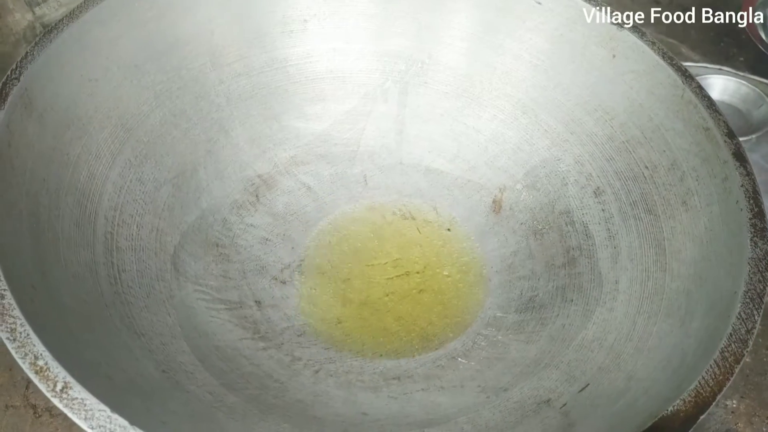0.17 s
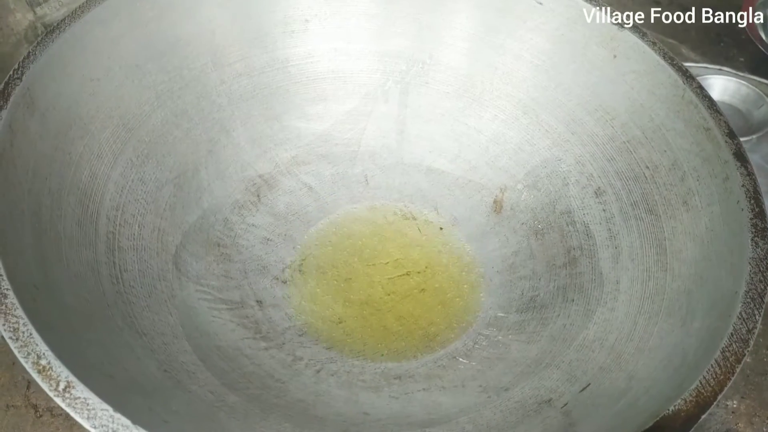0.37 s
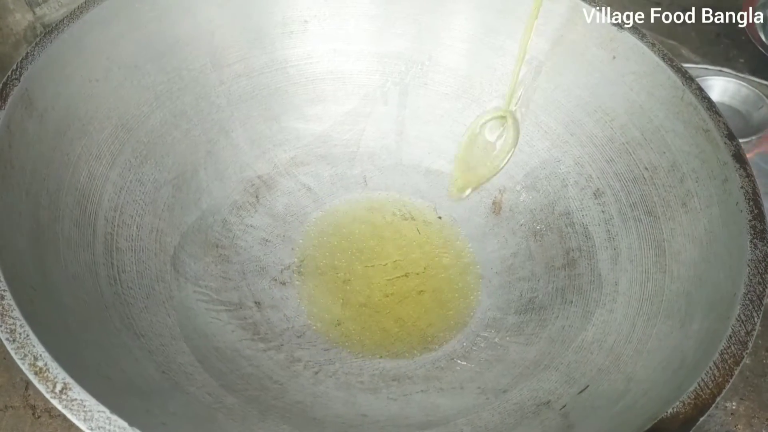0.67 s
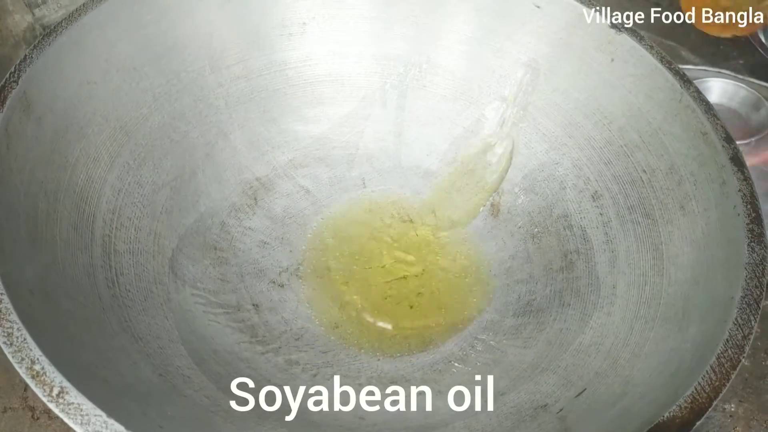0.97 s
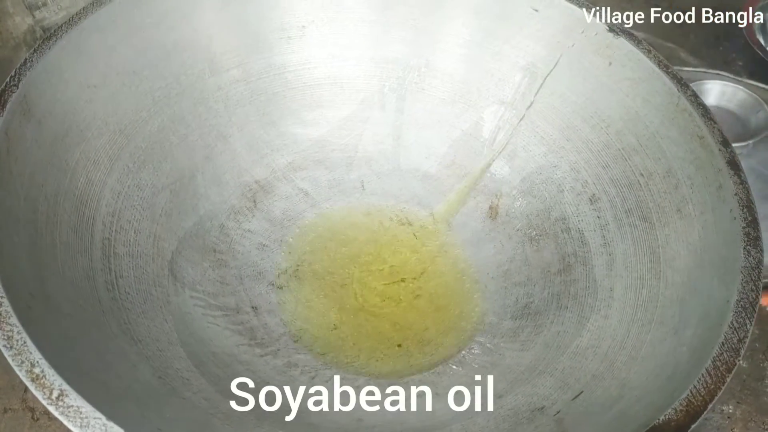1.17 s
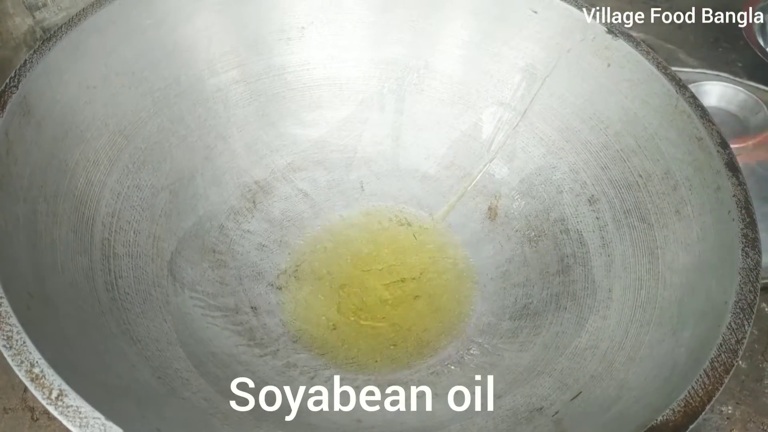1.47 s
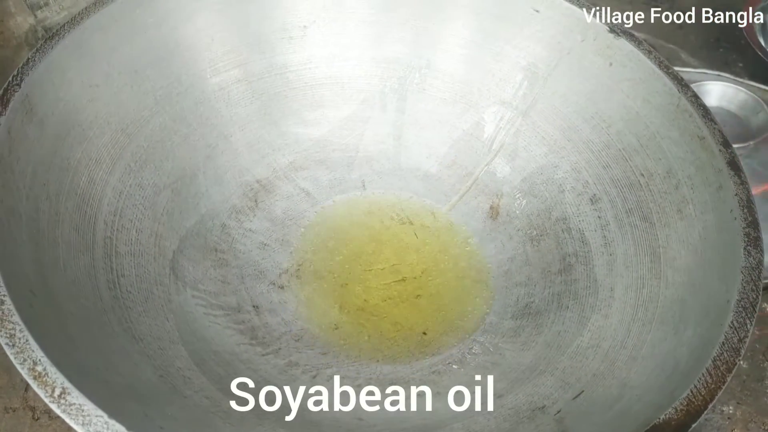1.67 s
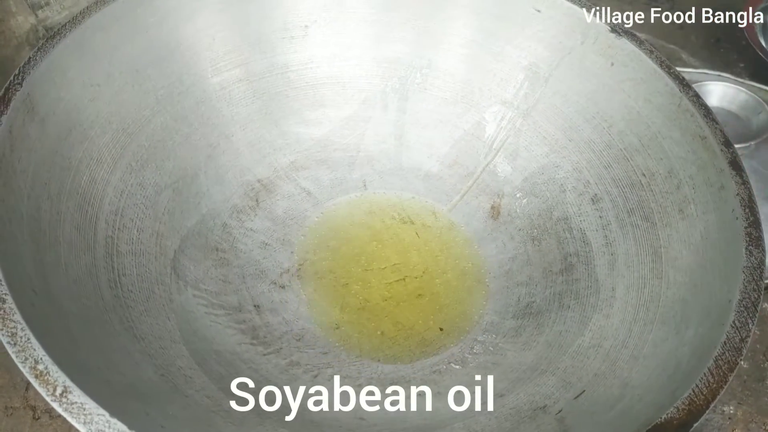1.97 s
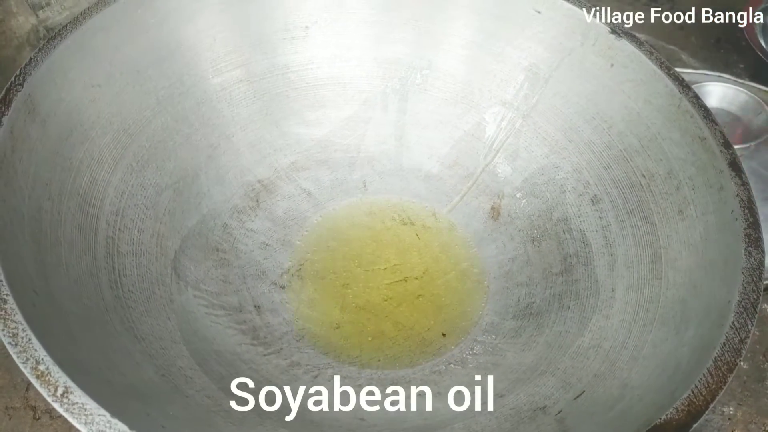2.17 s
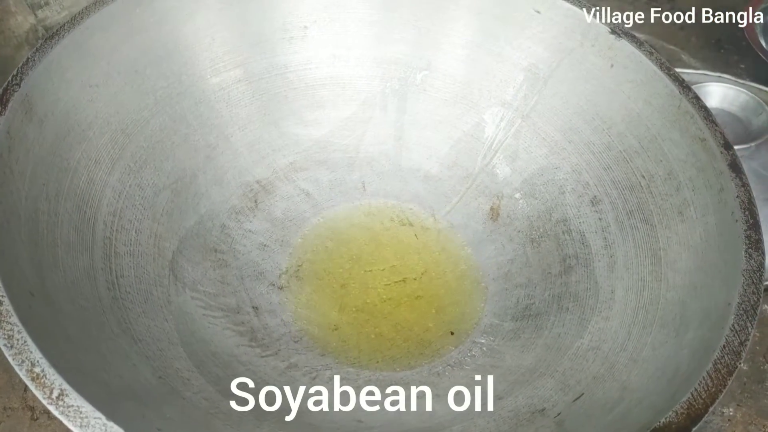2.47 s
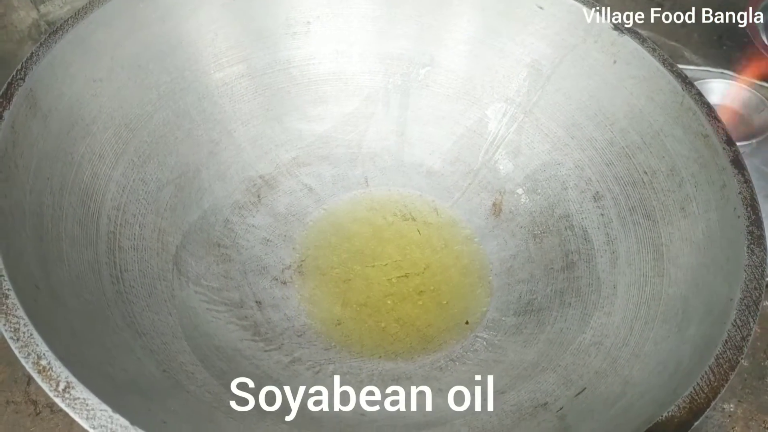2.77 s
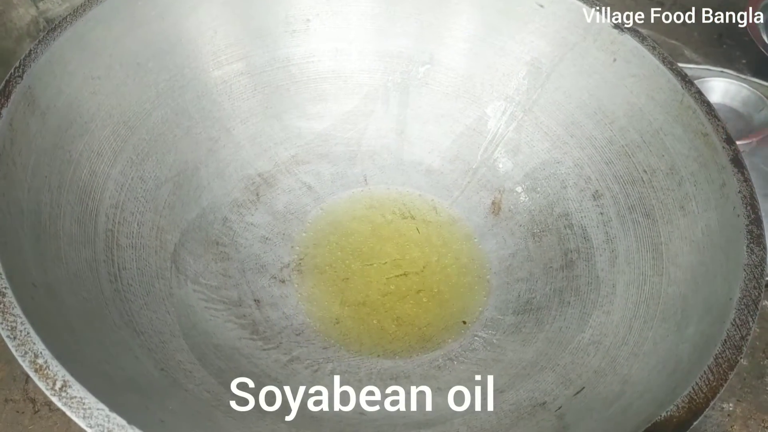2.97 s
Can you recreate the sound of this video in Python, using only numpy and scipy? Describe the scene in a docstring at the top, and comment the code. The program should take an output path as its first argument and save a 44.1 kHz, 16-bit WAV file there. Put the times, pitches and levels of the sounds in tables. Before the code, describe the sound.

Hot oil crackles and pops in a wide metal pan over a low flame

```python
"""Hot oil crackles in a wide metal pan over a burner, heard close up in stereo for 3.1 s.
From the start a low flame roar, a wavering hum, tiny spatters and a treble hiss run underneath, all shaped noise.
From 0.12 s steam bubbles burst: noise with a kick rings each at its own pitch and sprays hiss; a few ring cleanly.
Gurgles (clustered resonances) swell throughout and dry snaps (coloured clicks) join at 0.5 s; the pan rings along.
The treble hiss peaks near 0.9 s, sinks, and rises again at 2 s; the last pop falls at 2.8 s."""
import sys
import numpy as np
from scipy import signal
from scipy.fft import rfft, irfft
from scipy.io import wavfile
from scipy.ndimage import uniform_filter1d

SR = 44100
rng = np.random.default_rng(int(sys.argv[2]) if len(sys.argv) > 2 else 0)


def store_pcm(level_fs):
    """Save levels as 16-bit WAV."""
    pcm = np.round(np.clip(level_fs, -1, 1) * 32767).astype(np.int16)
    wavfile.write(sys.argv[1], SR, np.atleast_2d(pcm).T)


N = 136710


def amp(db):
    """Amplitude factor of a level in dB."""
    return 10 ** (np.asarray(db) / 20)


def evened(x):
    """Scales to rms 1."""
    return x / np.sqrt(np.mean(x ** 2) + 1e-20)


def peaked(x):
    """Scales each channel so that its strongest 8 ms have rms 1."""
    return x / np.sqrt(uniform_filter1d(x ** 2, size=350).max(axis=-1, keepdims=True) + 1e-20)


def read(points, hz):
    """Interpolates (Hz, value) points over log frequency."""
    f, value = np.transpose(points)
    return np.interp(np.log(hz + 1), np.log(f + 1), value)


def add(mix, start_s, sound):
    """Adds a stereo sound, cut at the end of the mix."""
    part = mix[:, max(round(start_s * SR), 0):][:, :sound.shape[1]]
    part += sound[:, :part.shape[1]]


def resonate(x, hz, width_hz):
    """Two-pole resonance of gain 1."""
    return signal.lfilter(*signal.iirpeak(hz, hz / width_hz, SR), x)


def band(x, low_hz, high_hz):
    """Butterworth band-pass."""
    return signal.sosfilt(signal.butter(2, [low_hz, high_hz], "bandpass", fs=SR, output="sos"), x)


def clumps(count):
    """Ragged gain, 2 dB rms: a burst is a clump of many small releases."""
    smooth_s = 0.0024
    ragged = uniform_filter1d(rng.standard_normal(count), round(smooth_s * SR))
    return amp(2 * evened(ragged))


def cluster(x, hz, spread, q):
    """Five bubbles of nearby pitch ring together, in alternating polarity."""
    steps = np.arange(-2, 3) + rng.uniform(-0.48, 0.46, 5)
    pitches_hz = hz * np.exp(spread * 0.75 * steps)
    return sum(resonate(x, f, f / q) * (-1) ** k for k, f in enumerate(pitches_hz))


def pop(time_s, ring_db, hz, spray_hz, spray_db, t60_s):
    """The skin snaps and a sputtering release of steam rings the bubble and sprays coloured hiss."""
    rise_s, kick, bubble_q, bubble_db = 0.003, 2.55, 5.6, -15.5
    spray_top_db, droplet_q, spray_wide = -9, 87, 0.33
    t = np.arange(8000) / SR
    noise = rng.standard_normal((2, len(t)))
    swell = np.minimum(t / rise_s, 1) ** 1.4 * clumps(len(t))
    release = swell * amp(-60 * t / t60_s)

    drive = release * noise
    drive[:, round(rise_s * SR)] += kick
    ring = peaked(resonate(resonate(drive, hz, hz / bubble_q), hz, 1.54 * hz))

    spray = release * noise[::-1]  # channels swapped
    wide, top = band(spray, 3200, 8150), band(spray, 11400, 22000)
    coloured = cluster(wide, spray_hz, 0.195, droplet_q) + spray_wide * wide
    coloured_top = cluster(top, 13080, 0.26, droplet_q) + spray_wide * top
    hiss = amp(spray_db) * peaked(coloured)
    hiss = hiss + amp(spray_db + spray_top_db) * peaked(coloured_top)
    return time_s - 0.44 * rise_s, amp(ring_db + bubble_db) * ring + hiss


def ping(start_s, level_db, hz, t60_s):
    """One bubble breaks free and rings cleanly: a decaying sine, alike in both channels."""
    t = np.arange(8000) / SR
    ring = amp(level_db - 60 * t / t60_s) * np.sin(2 * np.pi * hz * t)
    return start_s, band(ring, hz / 2, 2 * hz) * np.ones((2, 1))


def snap(click_s, peak_db, hz):
    """One coloured click inside a ragged puff of spray that builds just before it."""
    low_hz, q, tail_db, t60_s, dryness = 2300, 1.8, -20, 0.03, 0.93
    t = np.arange(-200, 3000) / SR
    fade_db = -60 * np.maximum(t, -3.5 * t) / t60_s
    puff = amp(tail_db - dryness * peak_db + fade_db)  # strong snaps are drier
    drive = puff * rng.standard_normal((2, len(t))) * clumps(len(t))
    drive[:, t == 0] = 1
    wide = band(drive, low_hz, 22000)
    sound = resonate(wide, hz, hz / q) + 0.54 * wide
    return click_s + t[0], amp(peak_db) * sound / abs(sound).max()


def gurgle(start_s, length_s, level_db, hz, spread):
    """A bloom of bubbles that swells fast and sinks slowly."""
    q, skew = 18.8, 0.43
    noise, clump = rng.standard_normal((2, 9000)), clumps(9000)
    u = np.arange(max(-start_s, 0), length_s, 1 / SR)[:9000] / length_s
    sound = evened(resonate(cluster(noise * clump, hz, spread, q), hz, hz / 2))
    bloom = np.sin(np.pi * u ** skew) ** 2
    return start_s, amp(level_db) * bloom * sound[:, :len(u)]


def sizzle():
    """Tiny spatters: decaying noise grains at random moments, in 12 pitch bands."""
    per_s, spread_db, level_db, low_hz, high_hz, bands = 420, 7, -44, 2710, 14100, 12
    out, t = np.zeros((2, N)), np.arange(900) / SR
    for hz in np.geomspace(low_hz, high_hz, bands):
        size = amp(spread_db * np.minimum(rng.exponential(1, N), 4))
        hits = size * (rng.random(N) < per_s / bands / SR)
        grain = resonate(rng.standard_normal((2, len(t))) * amp(-60 * t / 0.03), hz, hz / 3)
        out += signal.oaconvolve(hits[None], evened(grain), axes=1)[:, :N]
    return amp(level_db) * evened(out)


def pan(x):
    """Metal modes and a short diffuse tail from bowl and kitchen answer every sound of the oil."""
    # Each row: frequency in Hz, relative level in dB, t60 in s.
    pan_modes = [(2167, 10, 0.16), (2890, 14.5, 0.038)]
    modes_db, bowl_db, bowl_t60_s = -19.5, -8.5, 0.22
    t = np.arange(14000) / SR
    modes = sum(amp(db - 60 * t / t60_s) * np.sin(2 * np.pi * hz * t) / np.sqrt(t60_s * SR)
                for hz, db, t60_s in pan_modes)
    tail = rng.standard_normal((2, len(t))) * amp(-60 * t / bowl_t60_s) * (t > .004)
    answer = amp(modes_db) * modes + amp(bowl_db) * tail / np.linalg.norm(tail[0])
    return x + signal.fftconvolve(x, answer, axes=1)[:, :N]


def fizz():
    """Fine treble hiss of the hot oil: noise in patches of time and frequency that sputter."""
    # Level of the hiss before the sputter. Each row: time in s, level in dB.
    hiss_levels = [(0, -53), (.75, -59), (.9, -33), (1.8, -45), (2.0, -38), (2.45, -42.5), (3.1, -42)]
    a, b, c, d, patches = rng.standard_normal((N // 64 + 5, 129, 5)).T
    patches = evened(uniform_filter1d(uniform_filter1d(patches, 6, 0), 30, 1))
    flicker = evened(uniform_filter1d(a[0], 10))  # common to all bins
    z = np.array([a + 1j * b, c + 1j * d]) * amp(4 * patches + 3.5 * flicker)
    noise = signal.istft(z, nperseg=256, noverlap=192)[1][:, :N]
    hiss = evened(band(noise, 4500, 16400))
    level_db = np.interp(np.arange(N) / SR, *np.transpose(hiss_levels))
    return amp(level_db) * clumps(N) * hiss


def flame():
    """Low lumpy roar (spectrally shaped noise) and a wavering hum (narrowly resonated noise)."""
    # Spectrum of the roar. Each row: frequency in Hz, relative level in dB per Hz.
    roar_spectrum = [(25, -29.5), (140, -21), (205, 2), (430, -11), (700, -14.5), (1380, -15.5),
                     (2430, -18), (4740, -18.5), (10000, -50)]
    roar_db, patch_db = -37.5, 2.23
    hum_hz, width_hz, hum_db = 196.8, 6.8, -50.5
    frames, hz = N // 512 + 5, np.fft.rfftfreq(2048, 1 / SR)
    a, b, c, d, patches = rng.standard_normal((frames, 1025, 5)).T
    patches = evened(uniform_filter1d(uniform_filter1d(patches, 12, 0), 5, 1))
    shape = amp(read(roar_spectrum, hz)[:, None] + patch_db * patches)
    z = np.array([a + 1j * b, c + 1j * d]) * shape
    roar = signal.istft(z, nperseg=2048, noverlap=1536)[1][:, :N]
    hum = resonate(rng.standard_normal((2, N)), hum_hz, width_hz)
    hum = resonate(hum, hum_hz, width_hz)
    return amp(roar_db) * evened(roar) + amp(hum_db) * evened(hum)


def scene():
    """Sums all sources in two channels, then sets likeness, phase and level between left and right."""
    # Steam bursts. Each row: time in s, relative ring level in dB, bubble pitch in Hz,
    # spray centre in Hz, spray level in dB, decay t60 of the release in s.
    pops = [(0.1227, -3, 2230, 7350, -22, 0.033), (0.1512, -7.5, 2650, 5360, -21.5, 0.051),
            (.2267, -14.5, 2730, 4370, -25.5, 0.081), (0.2545, -16, 4570, 4260, -27, 0.035),
            (0.2917, -1.5, 3130, 4880, -22, 0.033), (0.32, -9, 4580, 4790, -49, 0.045),
            (.432, -10, 2950, 7820, -21, 0.11), (.618, -11.5, 3000, 4430, -33, 0.072),
            (0.6396, -7.5, 2890, 8260, -27, 0.058), (0.721, -22, 2920, 7160, -30, 0.03),
            (0.8288, -13.5, 2770, 4550, -17.5, 0.13), (0.873, -8, 2600, 4760, -24.5, 0.041),
            (0.8954, -32, 2830, 5170, -23.5, 0.071), (1.013, -18, 2130, 8300, -31, 0.25),
            (1.038, -24, 4300, 6670, -21.5, 0.034), (1.082, -16, 4520, 7130, -25.5, 0.1),
            (1.149, -23, 4700, 7410, -23.5, 0.044), (1.3388, -8, 3760, 4730, -22, 0.12),
            (1.356, -11.5, 2890, 5320, -20, 0.026), (1.4358, -1.5, 3390, 4450, -35, 0.052),
            (1.4658, -25, 3160, 5140, -30.5, 0.3), (1.6203, -5.5, 3430, 4990, -22, .08),
            (1.7546, -22, 4960, 8900, -46.5, .06), (1.986, -10.5, 4140, 4660, -35.5, 0.13),
            (2.0828, -9.5, 3770, 4990, -20.5, 0.093), (2.3388, -12, 3880, 4530, -47, 0.059),
            (2.549, -41, 4460, 5360, -20.5, 0.031), (2.5682, -21, 4570, 4800, -25, 0.054),
            (2.8094, -8.5, 5400, 6050, -23, 0.032)]
    # Gurgles under the oil. Each row: start in s, length in s, level before the swell in dB,
    # pitch in Hz, relative pitch spread as a share.
    gurgles = [(-.03, 0.097, -27.5, 1510, 0.13), (0.384, 0.063, -33.5, 2120, 0.12),
               (0.487, 0.063, -32, 2050, 0.073), (.648, 0.034, -22.5, 2400, 0.038),
               (0.839, 0.053, -15, 2874, 0.02), (.86, 0.28, -34, 2310, 0.1), (1.005, 0.13, -36, 2090, 0.11),
               (1.474, 0.11, -32.5, 2016, 0.21), (1.57, 0.11, -34, 2140, 0.059),
               (2.001, 0.11, -33, 2160, .12), (2.098, 0.067, -30, 1920, 0.055),
               (2.167, 0.11, -30.5, 1555, 0.14), (2.239, 0.076, -33, 2030, 0.058),
               (2.37, 0.13, -28, 1826, 0.2), (2.481, 0.16, -34, 2057, 0.095),
               (2.868, 0.11, -37.5, 2120, 0.087), (2.943, 0.079, -30.5, 2150, 0.096)]
    # Dry snaps of single droplets. Each row: click time in s, peak in dB, colour in Hz.
    snaps = [(0.5007, -17, 13100), (.7132, -15, 8300), (.7247, -11.5, 6600), (0.7807, -11, 4400),
             (0.822, -14.5, 7850), (0.828, -24, 6500), (0.952, -15, 7800), (1.017, -10.5, 7800),
             (1.0735, -6, 7500), (1.135, -23, 8500), (1.207, -21, 10500), (1.2511, -12.5, 8900),
             (1.285, -9.5, 8500), (1.3998, -9.5, 9500), (1.622, -9, 4000), (1.76, -10.5, 11900),
             (1.833, -28, 5960), (1.845, -27, 13000), (1.883, -16.5, 7900), (1.9308, -10.5, 12000),
             (1.943, -6, 13100), (1.965, -7, 13100), (2.018, -16.5, 8700), (2.058, -17, 8000),
             (2.0868, -13, 9200), (2.194, -5, 11000), (2.5234, -15.5, 9800), (2.6722, -1.5, 5800),
             (2.7571, -10, 6450), (2.9916, -24.5, 10000), (3.0426, -27, 10200)]
    # Single clean bubbles. Each row: start in s, level before the band-pass in dB, pitch in Hz, t60 in s.
    pings = [(0.2942, -12.5, 2920, 0.029), (0.641, -5, 2942, 0.029), (1.097, -39.5, 1053, 0.24),
             (2.3381, -3, 3800, .006)]
    # Left-right likeness. Each row: frequency in Hz, share from 0 to 1.
    likeness = [(150, 0.93), (300, 0.88), (1400, 0.29), (2800, 0.96), (6000, 0.6), (15000, 0.4)]
    # Phase by which left leads. Each row: frequency in Hz, lead in radians.
    left_lead = [(600, 0.1), (1400, -2.45), (2840, -1.32), (4200, -1.4), (9000, -2)]
    # Left minus right. Each row: frequency in Hz, difference in dB.
    left_tilt = [(60, 0.5), (380, -2.5), (2380, 3.5), (15000, 1.5)]

    oil = sizzle()
    for sound, rows in ((pop, pops), (gurgle, gurgles), (snap, snaps), (ping, pings)):
        for row in rows:
            add(oil, *sound(*row))
    a, b = rfft(pan(oil) + flame() + fizz(), axis=1)

    hz = np.fft.rfftfreq(N, 1 / SR)
    same = np.clip(read(likeness, hz), 0, 1)
    tilt = amp(read(left_tilt, hz) / 2)  # half on each side
    right = same * a * np.exp(-1j * read(left_lead, hz)) + np.sqrt(1 - same ** 2) * b
    return irfft([a * tilt, right / tilt], N, axis=1)


def record(dry):
    """Linear-phase low-pass: the treble ends at the edge frequency."""
    edge_hz = 16100
    lowpass = signal.firwin(511, edge_hz, window=("kaiser", 9), fs=SR)
    return signal.oaconvolve(dry, lowpass[None], "same")


dry = scene()
out = record(dry)
store_pcm(out)
```